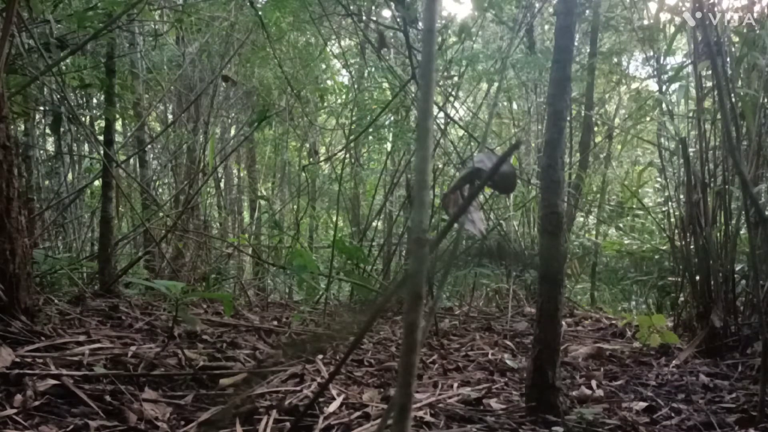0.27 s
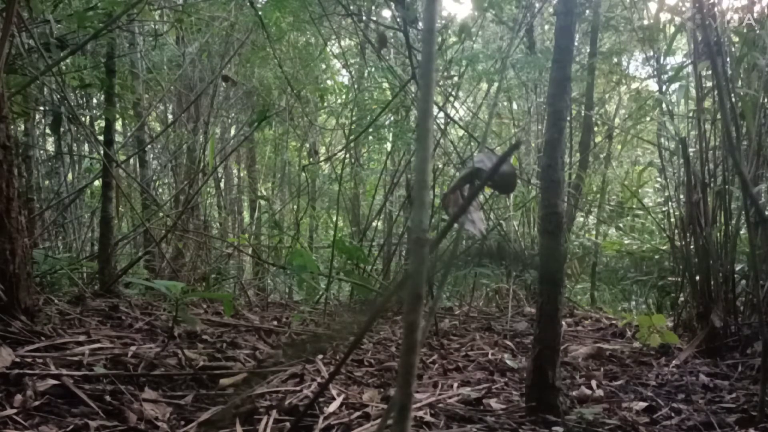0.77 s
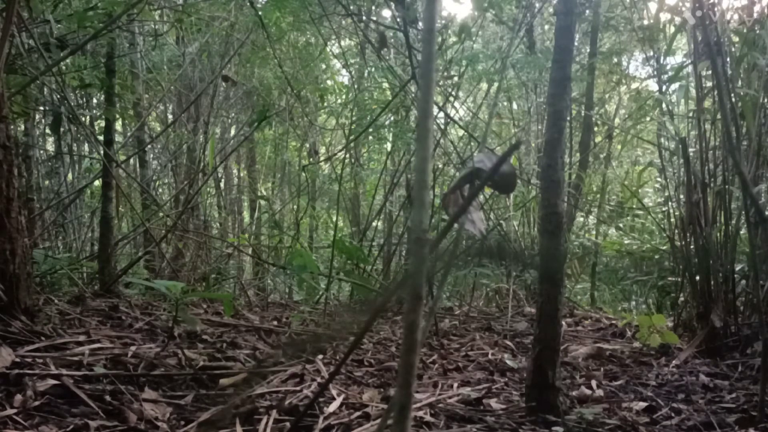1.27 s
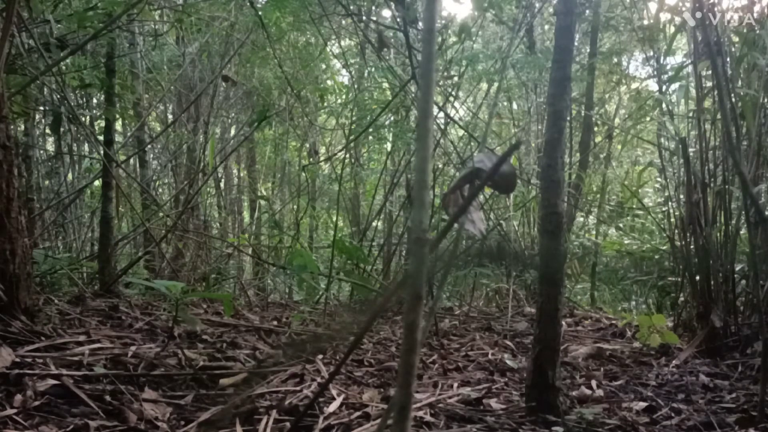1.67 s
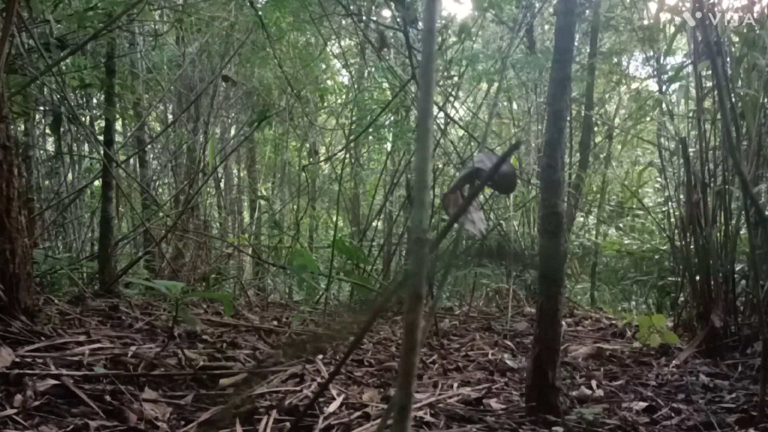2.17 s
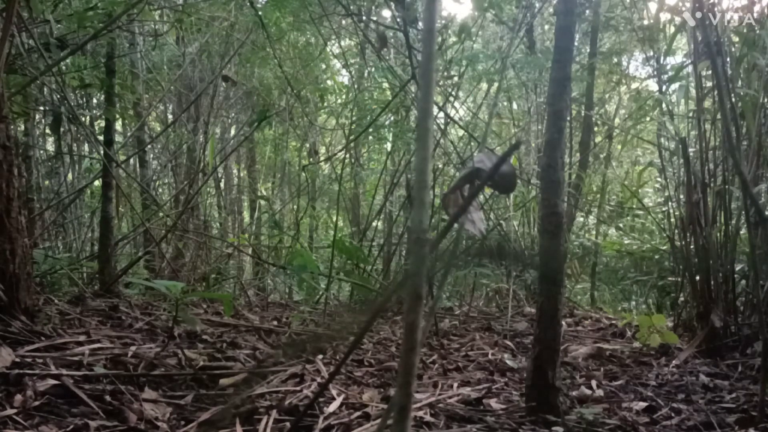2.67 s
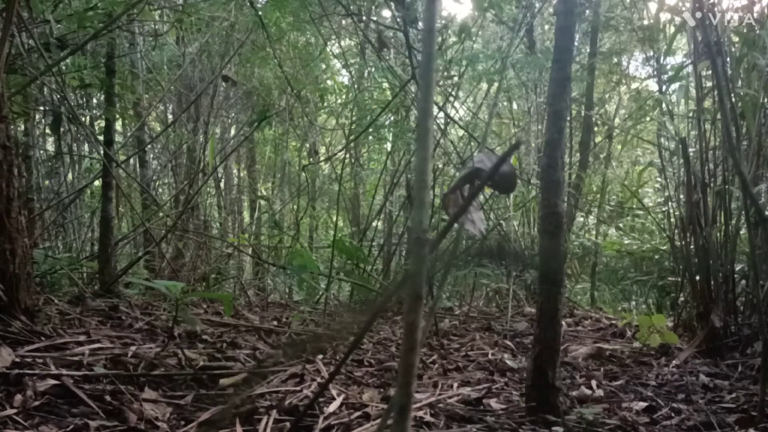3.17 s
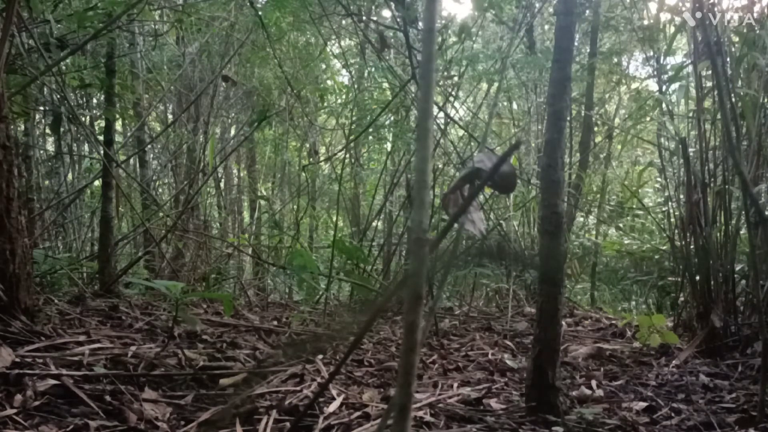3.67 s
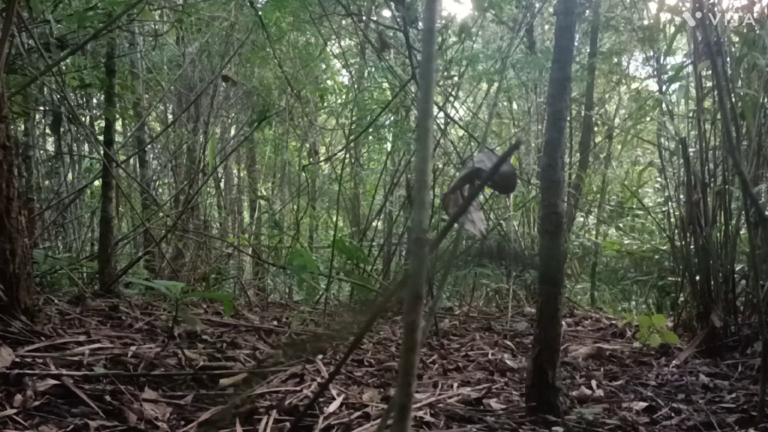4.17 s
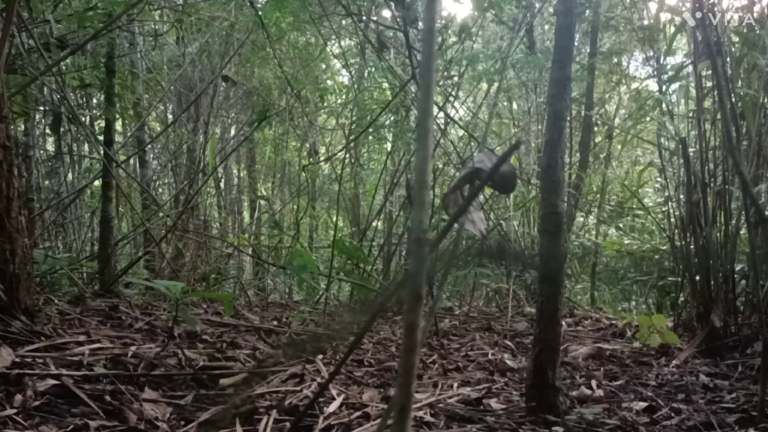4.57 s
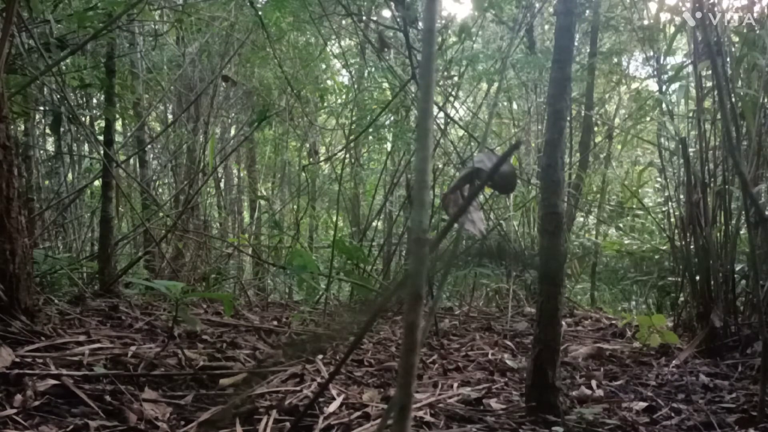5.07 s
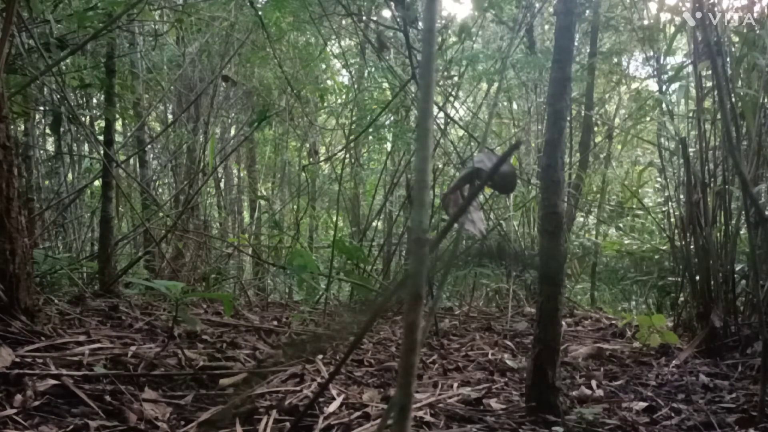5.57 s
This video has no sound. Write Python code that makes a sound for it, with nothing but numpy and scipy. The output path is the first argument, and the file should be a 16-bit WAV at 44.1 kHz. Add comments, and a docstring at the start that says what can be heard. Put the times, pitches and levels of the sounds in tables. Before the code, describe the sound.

Four rasping bird cackles burst out loudly, then stop; pulsing cicada buzz and steady insect hiss continue, with one dry twig snap.

```python
"""A jungle fowl hen gives four harsh, toneless squawks: uneven throat pulses and hissing air, shaped by her beak.
A cicada throbs in a bamboo forest: fuzzy tones and a dry rasp, broken up by rapid clicks.
Steady noise and thin tones make an insect chorus, over still air and faintly rustling leaves.
A dry twig snaps in a few short noise bursts and a dull push.
Two microphone ports colour the treble differently, and the gain recovers slowly after loud sounds."""
import sys
import numpy as np
from scipy import signal
from scipy.fft import rfft, irfft, next_fast_len
from scipy.io import wavfile
from scipy.ndimage import uniform_filter1d, map_coordinates

SR = 44100
rng = np.random.default_rng(int(sys.argv[2]) if len(sys.argv) > 2 else 0)


def persist_wave(psi):
    """Save psi, clipped to +-1, as 16-bit WAV."""
    counts = np.round(np.clip(psi, -1, 1) * 32767).astype(np.int16)
    wavfile.write(sys.argv[1], SR, np.atleast_2d(counts).T)


N = 257103

# The hen's squawks, the first already under way.
# Each row: start in seconds, length in seconds, relative effort at the start in dB.
SQUAWKS = [(-.06, 0.17, -18.5), (0.227, 0.18, -18.5), (0.5, 0.16, -17), (0.752, 0.17, -16.5)]
# Her throat and open beak. Each row: frequency in Hz, relative strength in dB per Hz.
THROAT_COLOUR = [(100, -53.5), (280, -27.5), (450, -22.5), (620, -19.5), (760, -26), (1000, -21),
                 (1200, -5), (1430, -4), (1620, -8), (2000, 2.5), (2230, -1), (2500, -13.5), (3100, -19),
                 (4500, -36)]
# The air hissing through them. Each row: frequency in Hz, relative strength in dB per Hz.
HISS_COLOUR = [(2000, -30), (3300, -8), (3780, -11.5), (4400, -3.5), (5000, -1.5), (6400, -1.5),
               (7600, 3.5), (8000, 1), (8700, 1.5), (10000, -8.5), (11500, 0.5), (12400, -12.5),
               (14300, -9), (16000, -11.5)]
# Every squawk bursts out, grows as she presses harder, and closes quickly.
ATTACK_S, PRESS_DB_PER_S, RELEASE_S = 0.012, 19.5, 0.028

# Overtones of the cicada's ringing abdomen, first to third.
# Each row: relative level in dB, width in Hz, dB gained per dB of swell.
ABDOMEN_OVERTONES = [(-43, 720, .9), (-61, 1900, 1.2), (-59, 1900, 1.4)]
# The cicada's tempo. Each row: time in seconds, throbs per second.
THROB_TEMPO = [(1.3, 11.53), (1.9, 11.83), (2.8, 11.27), (3.6, 11.79), (5, 11.59)]
# Every throb swells, holds and fades (shares of a cycle); the song is met partway through one.
THROB_RISE, THROB_HOLD, THROB_FADE, THROB_START = 0.17, 0.13, 0.32, .34
THROB_DEPTH_DB = 9.5
# The abdomen's pitch swings around its middle once a throb, lowest at this share of the cycle.
ABDOMEN_HZ, SAG_HZ, SAG_AT = 5060, 270.7, 0.41

# The far insect chorus. Each row: frequency in Hz, relative strength in dB per Hz.
CHORUS_COLOUR = [(2800, -31.5), (3900, -15.5), (4250, -17.5), (4550, -8), (5150, 1.5), (5520, -2),
                 (5780, -27), (6600, -24.5), (7400, -32.5), (8200, -40.5), (10500, -28.5), (12500, -36),
                 (15000, -33.5)]
# A distant insect drone. Each row: frequency in Hz, width in Hz, relative level in dB.
DRONE_TONES = [(468, 71, -81), (980, 80, -86.5), (2016, 85, -77), (3025, 110, -74.5), (10290, 39.8, -77)]
# The still air of the forest. Each row: frequency in Hz, relative strength in dB per Hz.
AIR_COLOUR = [(20, -5.5), (90, -0.5), (170, 8), (300, 1.5), (450, 6.5), (650, -13), (950, -4), (1500, -20),
              (3000, -18.5), (6000, -17), (16000, -20.5)]
# Leaves stirring. Each row: time of the height in seconds, half length in seconds, relative level in dB.
LEAF_STIRS = [(2.334, 0.18, -53.5), (4.119, 0.14, -63), (4.501, .14, -57.5), (5.099, 0.0512, -58),
              (5.47, .1, -62)]
# The colour of the leaves. Each row: frequency in Hz, relative strength in dB per Hz.
LEAF_COLOUR = [(2000, -15), (5000, -5.5), (7000, -2), (9000, 3.5), (12000, -1), (15500, -8)]

# Fibres of the twig giving way.
# Each row: start in seconds, relative level in dB, time to die by 60 dB in seconds.
FIBRE_CRACKS = [(1.9674, -26.5, .012), (1.9697, -24, .025), (1.9730, -2, .004), (1.9747, -8.5, 0.0082),
                (1.977, -24, .06)]
# The colour of the crack. Each row: frequency in Hz, relative strength in dB per Hz.
CRACK_COLOUR = [(60, -28), (250, -22), (700, -19.5), (1600, -26), (2400, -8), (3100, -14.5), (4300, -5.5),
                (5600, -1.5), (6600, -5), (7600, -4), (9200, 4.5), (10500, -0.5), (12300, -9.5),
                (14600, -6.5), (16000, -13)]
# The twig's dull push. Each row: frequency in Hz, relative strength in dB per Hz.
PUSH_COLOUR = [(30, 3), (200, -6.5), (650, -2), (1100, -1.5), (2000, -18), (4000, -38.5)]

# The forest's echo tail. Each row: frequency in Hz, time to die by 60 dB in seconds.
FOREST_DECAY = [(200, .25), (800, 0.19), (2000, 0.41), (6000, 0.432), (14000, 0.49)]
# Thin stems throw back more treble. Each row: frequency in Hz, gain in dB.
STEM_SCATTER = [(300, -2.5), (1300, -1.5), (2200, -3), (6000, 0), (14000, 2.5)]
# The colour of the microphone ports. Each row: frequency in Hz, left gain in dB, right gain in dB.
PORT_COLOUR = [(690, 3.5, 3), (1350, -2, 2.5), (1600, 0.5, -4), (1970, -4.5, 2), (2180, 2.5, 0.5),
               (3140, -5, -2), (5110, -8, 3), (6300, -20, 9), (7300, -8.5, 3), (8440, 2.5, -11.5),
               (9690, 2.5, -16.5), (11100, 3.5, -8.5), (12870, -2, 4), (14530, -11.5, 7.5)]
TOP_HZ = 15600  # nothing passes at or above this pitch


def amp(db):
    """Turn decibels into a gain."""
    return 10 ** (np.asarray(db) / 20)


def unit(x):
    """Scale to an average (rms) level of 1."""
    return x / np.sqrt(np.mean(np.abs(x) ** 2) + 1e-20)


def along(points, hz, axis=1):
    """Read one column of a table between its frequencies, on a log scale."""
    columns = np.transpose(points)
    return np.interp(np.log(hz + 1), np.log(columns[0]), columns[axis])


def curve(rows):
    """Turn rows of time and value into one value per sample."""
    return np.interp(np.arange(N) / SR, *np.transpose(rows))


def wobble(rate):
    """A smooth random curve through `rate` random points a second."""
    points = rng.standard_normal(int(N * rate / SR) + 4)
    return map_coordinates(points, [np.arange(N) * rate / SR], mode="nearest")


def filtered(x, response):
    """Multiply each frequency of x by a response, with spare room for echoes at the end."""
    size = next_fast_len(N + SR // 2)
    hz = np.fft.rfftfreq(size, 1 / SR)
    return irfft(rfft(x, size) * response(hz), size)[..., :N]


def coloured(x, spectrum):
    """Shape x with the given spectrum, at rms 1."""
    return unit(filtered(x, lambda hz: amp(along(spectrum, hz))))


def noise(alike):
    """White noise at two ports: 0 makes them unrelated, 1 makes them the same."""
    turn = np.arccos(np.clip(alike, 0, 1)) / 2
    mid, side = rng.standard_normal((2, N))
    return np.cos(turn) * mid + np.sin(turn) * np.array([side, -side])


def ringing(pitch_hz, width_hz):
    """A fuzzy tone: its strength and phase wander at the rate of its width."""
    phase = 2 * np.pi * np.cumsum(pitch_hz * np.ones(N)) / SR
    wander = wobble(width_hz) + 1j * wobble(width_hz)
    return unit(np.real(wander * np.exp(1j * phase)))


def pulses(rate_hz, jitter, scatter_db):
    """A train of single-sample pulses, uneven in timing and size."""
    cycles = np.cumsum(rate_hz * np.exp(jitter * wobble(rate_hz))) / SR
    ticks = np.diff(np.floor(cycles), prepend=0)  # a tick whenever a cycle is completed
    return ticks * amp(scatter_db * rng.standard_normal(N))


def puffs(train, life_s):
    """Let each pulse die away as a short puff; the whole envelope has rms 1."""
    keep = np.exp(-1 / (abs(life_s) * SR))
    return unit(signal.lfilter([1], [1, -keep], train))


def gate(t, attack, hold, release):
    """Rise from 0 to 1, hold, and fall back to 0."""
    corners = np.cumsum(np.abs([0, attack, hold, release]))
    return np.interp(t, corners, [0, 1, 1, 0])


def stems(x, echo_db, count=7):
    """The ground and the nearest stems return weak copies within a few milliseconds."""
    delays_s = rng.uniform(.001, .009, count)

    def direct_and_copies(hz):
        """The straight sound plus every delayed copy."""
        return 1 + amp(echo_db) * sum(np.exp(-2j * np.pi * hz * delay) for delay in delays_s)

    return filtered(x, direct_and_copies)


def forest(x):
    """Stems and leaves scatter the sound into a fading tail of noise at each port."""
    hz, _, z = signal.stft(rng.standard_normal((2, SR)), SR, nperseg=256)
    t = np.arange(z.shape[-1]) * 128 / SR
    fade = amp(-60 * t / along(FOREST_DECAY, hz)[:, None])
    tail = signal.istft(z * fade, SR, nperseg=256)[1]
    return signal.fftconvolve(x, tail / np.linalg.norm(tail[0]), axes=1)[:, :N]


def squawk(start, length, db):
    """The effort of one squawk: a sudden start, a steady crescendo, a quick close."""
    t = np.arange(N) / SR - start
    crescendo = amp(db + PRESS_DB_PER_S * np.clip(t, 0, length))
    return crescendo * gate(t, ATTACK_S, length - ATTACK_S, RELEASE_S)


def hen():
    """The syrinx (voice organ) slaps chaotically; each slap puffs turbulent air through the throat."""
    effort = sum(squawk(*call) for call in SQUAWKS)
    slaps = pulses(rate_hz=620, jitter=.35, scatter_db=2)
    flow = puffs(slaps, life_s=0.0023)
    breath = coloured(flow * noise(alike=0.93), THROAT_COLOUR)
    voice = unit(coloured(slaps, THROAT_COLOUR) + 0.7 * breath)
    hiss = amp(-10.5) * coloured(flow * noise(alike=0.49), HISS_COLOUR)
    voice = unit(stems(voice, echo_db=-18.5))
    hiss = stems(hiss, echo_db=-15.5)
    # the membranes swing only so far, which keeps the rasp evenly loud under its flutter
    swing = np.sqrt(np.abs(uniform_filter1d(np.mean(voice ** 2, axis=0), size=300)))
    flutter = amp(1.3 * wobble(140))
    voice = unit(voice / (swing + .5)) * flutter
    # small moves of neck and beak shift all the resonances together
    clock = np.arange(N) + 0.00042 * SR * wobble(25)
    voice = np.array([map_coordinates(port, [clock], mode="reflect") for port in voice])
    # so small a beak radiates hardly any bass
    beak = signal.butter(2, 200, "highpass", fs=SR, output="sos")
    call = signal.sosfilt(beak, effort * (voice + hiss))
    # the left port hears her a moment sooner
    lead_s, sides = 7e-5, np.array([[1], [-1]])
    return filtered(call, lambda hz: np.exp(1j * np.pi * hz * lead_s * sides))


def throb():
    """The cicada's pitch (Hz) and swell (dB), the same in every cycle of its tempo."""
    share = (THROB_START + np.cumsum(curve(THROB_TEMPO)) / SR) % 1
    pitch_hz = ABDOMEN_HZ - SAG_HZ * np.cos(2 * np.pi * (share - SAG_AT))
    swell_db = THROB_DEPTH_DB * (gate(share, THROB_RISE, THROB_HOLD, THROB_FADE) - 1)
    return pitch_hz, swell_db


def cicada():
    """Clicks of the tymbals (drum skins) ring the abdomen, whose pitch swings with each throb."""
    pitch_hz, swell_db = throb()
    song = np.zeros((2, N))
    for order, (db, width_hz, growth) in enumerate(ABDOMEN_OVERTONES, 1):
        shared = ringing(order * pitch_hz, width_hz)
        # higher overtones differ more between the two ports
        ports = [shared + .5 * order * ringing(order * pitch_hz, width_hz) for port in range(2)]
        song += amp(db + growth * swell_db) * unit(np.array(ports))
    # the clicks themselves add a dry rasp beside the ring
    rasp_colour = [(4000, -24.5), (6500, 3.5), (8000, -12.5), (15000, -15.0)]  # Hz, dB per Hz
    song += amp(-64.5 + swell_db) * coloured(noise(alike=.5), rasp_colour)
    clicks = puffs(pulses(rate_hz=410, jitter=0.082, scatter_db=0.5), life_s=.005)
    slow_drift = amp(.5 * wobble(6))
    song = stems(song * clicks * slow_drift, echo_db=-16)
    return song + amp(-8) * forest(song)


def chorus():
    """Many far insects merge into a shrill band of noise, joined by a drone of thin tones."""
    level = amp(-45.5 + .5 * wobble(1.9) + 1.26 * wobble(45))  # slow drift and quick flicker
    band = coloured(noise(alike=0.22), CHORUS_COLOUR) * level
    drone = sum(amp(db + 0.61 * wobble(0.92)) * ringing(hz, width_hz) for hz, width_hz, db in DRONE_TONES)
    return band + drone


def undergrowth():
    """Still air as steady noise, and dry leaves that crackle softly as they stir."""
    air = amp(-72.5) * coloured(noise(alike=.85), AIR_COLOUR)
    t = np.arange(N) / SR
    stir = sum(amp(db) * np.exp(-((t - height) / half) ** 2) for height, half, db in LEAF_STIRS)
    crackle = amp(2 * wobble(120))
    leaves = stir * crackle * coloured(noise(alike=0.17), LEAF_COLOUR)
    return air + leaves


def twig():
    """A few fibres crack in quick succession, each a dying burst through the wood's colour."""
    t = np.arange(N) / SR
    bursts = sum((t >= s) * amp(db - 60 * np.abs(t - s) / t60) for s, db, t60 in FIBRE_CRACKS)
    crack = filtered(bursts * noise(alike=0.4), lambda hz: amp(along(CRACK_COLOUR, hz)))
    # the whole twig gives way with a soft, dull push
    push = amp(-43) * np.exp(-((t - 1.972) / 0.0046) ** 2)
    return crack + push * coloured(noise(alike=0.778), PUSH_COLOUR)


def scene():
    """The near hen and twig, their echo among the stems, and the forest behind."""
    calls = amp(3.5) * hen()
    snap = twig()
    sent_out = amp(-22.0) * calls + amp(-26) * snap
    echo = forest(filtered(sent_out, lambda hz: amp(along(STEM_SCATTER, hz))))
    return calls + snap + echo + cicada() + chorus() + undergrowth()


def gain_control(x, threshold_db, release_db):
    """Loud sound turns the gain down at once; it creeps back at release_db a second."""
    power = np.abs(uniform_filter1d(np.mean(x ** 2, axis=0), size=2048))
    excess_db = np.maximum(10 * np.log10(power + 1e-12) - threshold_db, 0)
    recovery_db = release_db * np.arange(N) / SR
    # the strongest excess so far, less what has been recovered since
    cut_db = np.maximum.accumulate(excess_db + recovery_db) - recovery_db
    return x * amp(-cut_db)


def record(dry):
    """Port colour, gain control, soft saturation of the peaks and the band limit."""
    def ports(hz):
        """The gain of the left and right port."""
        return amp([along(PORT_COLOUR, hz, axis=1), along(PORT_COLOUR, hz, axis=2)])

    heard = filtered(dry, ports)
    held = gain_control(heard, threshold_db=-12.5, release_db=3)
    rounded = held / (1 + np.abs(held / .88) ** 8) ** (1 / 8)  # peaks bend towards 0.88
    return filtered(rounded, lambda hz: hz < TOP_HZ)


dry = scene()
out = record(dry)
persist_wave(out)
```